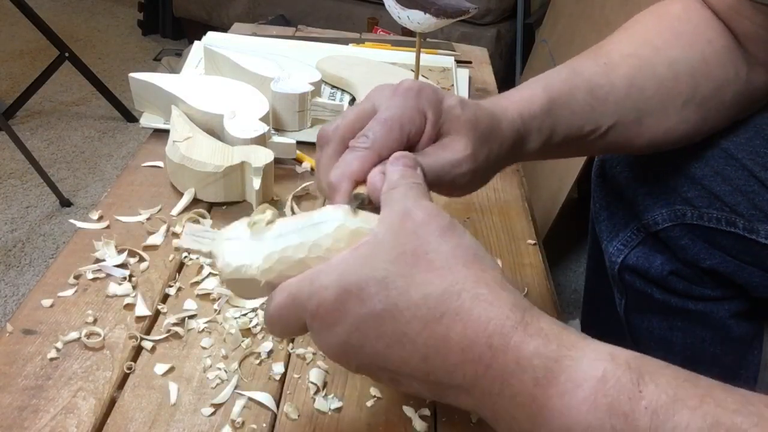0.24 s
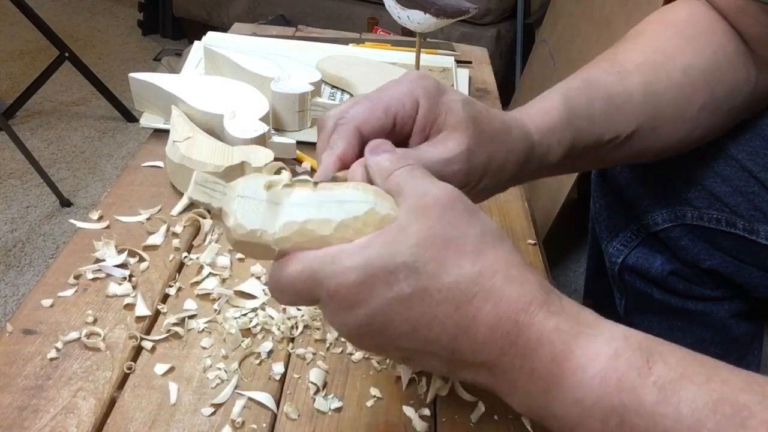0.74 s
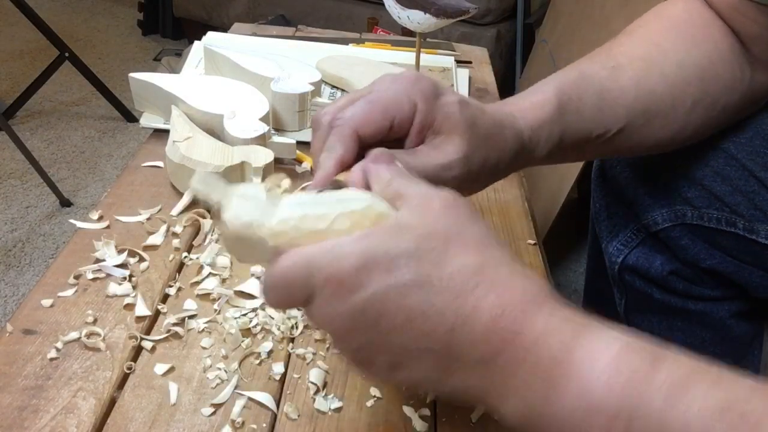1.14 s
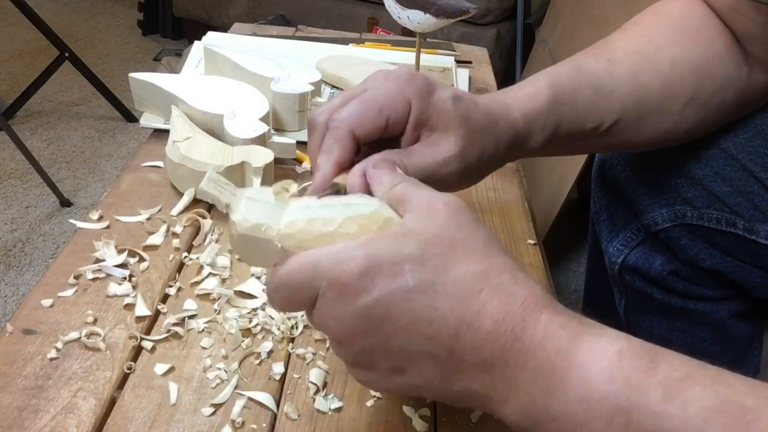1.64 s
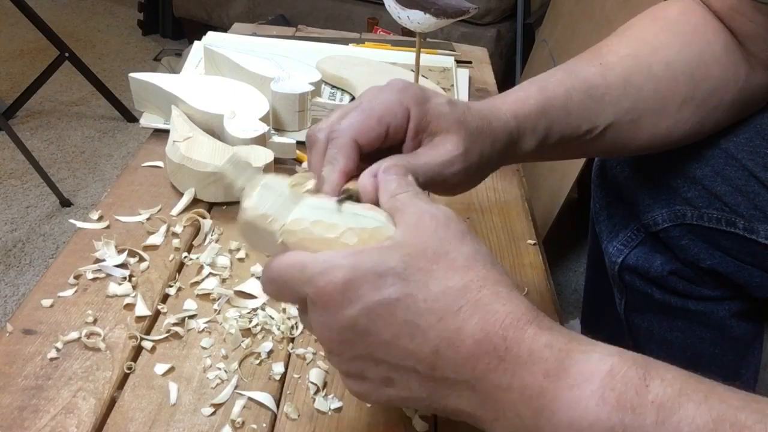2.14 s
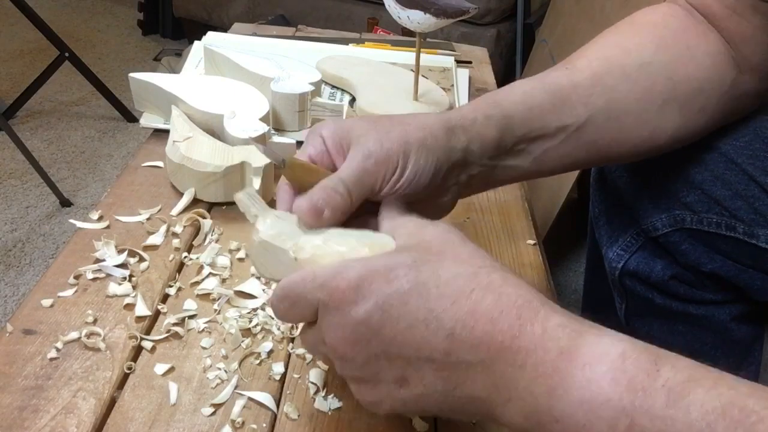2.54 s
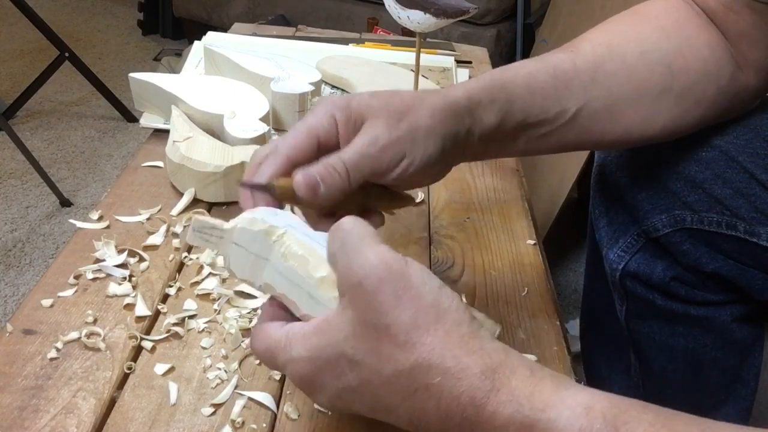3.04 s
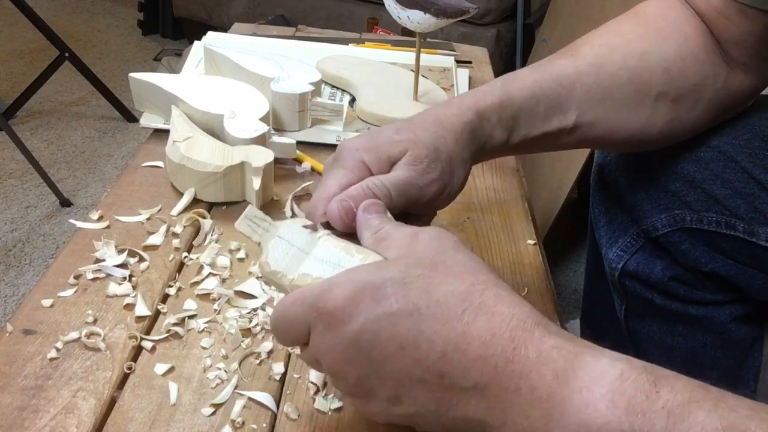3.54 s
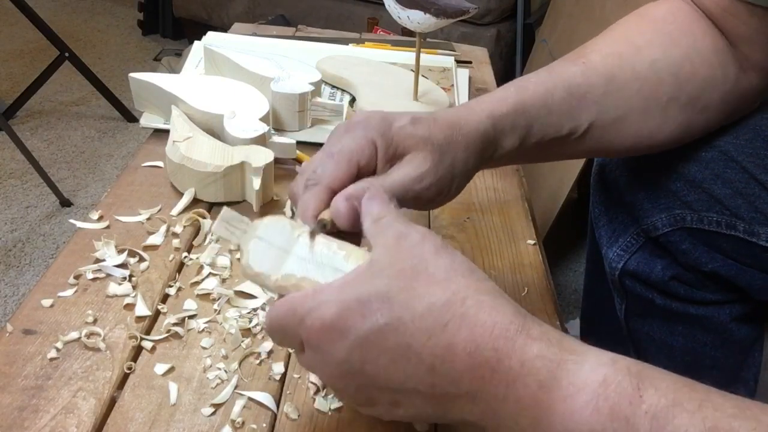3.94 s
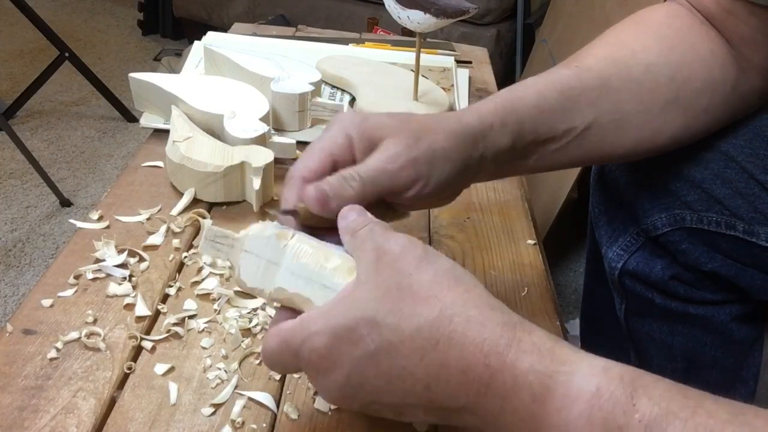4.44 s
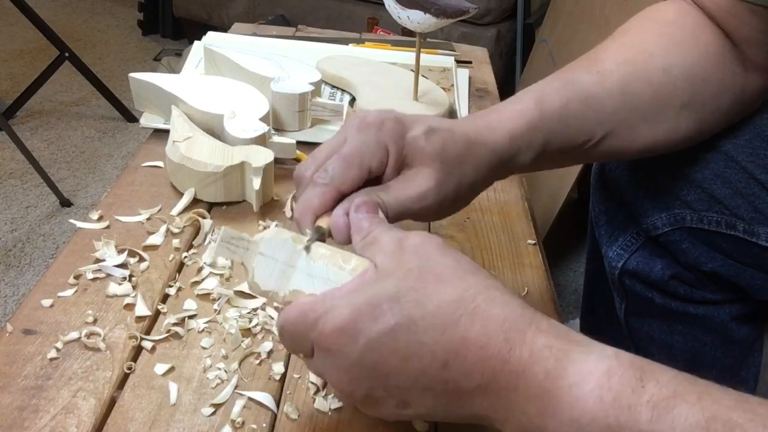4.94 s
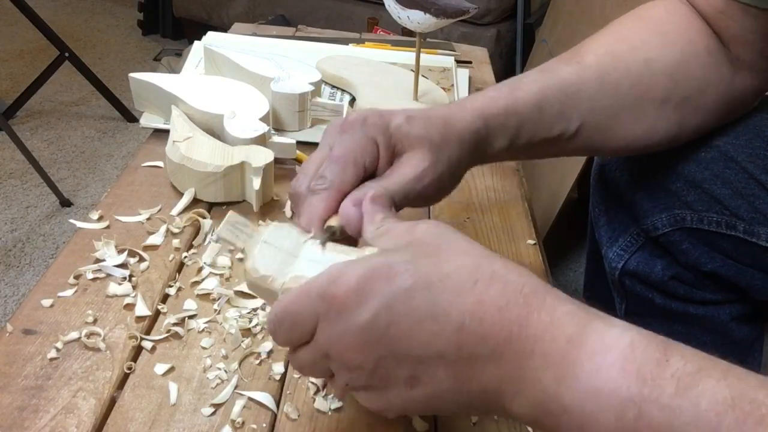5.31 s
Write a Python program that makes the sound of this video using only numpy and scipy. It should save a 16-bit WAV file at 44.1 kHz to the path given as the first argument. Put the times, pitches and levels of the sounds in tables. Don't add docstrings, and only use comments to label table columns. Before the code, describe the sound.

Close-up wood carving in a quiet indoor workspace. Irregular short strokes of a blade scratch and chatter through dry grain, each freeing a shaving with a crisp click. Around three seconds the block is turned, with softer handling and small ticks, then cutting resumes with a slightly different blade ring and finishes in a cluster of hard snaps. Low room air and soft fan hum lie underneath; little reverberation.

```python
import sys
import numpy as np
from scipy import signal
from scipy.fft import rfft, irfft
from scipy.io import wavfile
from scipy.ndimage import uniform_filter1d

SR = 44100
rng = np.random.default_rng(int(sys.argv[2]) if len(sys.argv) > 2 else 0)


def dump(signal):
    limited = np.clip(np.atleast_2d(signal).T, -1, 1)
    pcm = np.round(limited * 32767).astype(np.int16)
    wavfile.write(sys.argv[1], SR, pcm)


def level_to_linear(level):
    exponent = np.asarray(level, float) / 20
    return 10 ** exponent


N = 245637


def evened(x):
    return x / np.sqrt(np.mean(x ** 2) + 1e-20)


def read(points, hz):
    f, value = np.transpose(points)
    return np.interp(np.log(hz + 1), np.log(f + 1), value)


def held(table, s):
    times, *columns = np.transpose(table)
    return [np.interp(s, times, column) for column in columns]


def add(mix, s, sound):
    part = mix[..., round(s * SR):][..., :sound.shape[-1]]
    part += sound[..., :part.shape[-1]]


def blend(a, b, b_db):
    return (a + level_to_linear(b_db) * b) / np.sqrt(1 + level_to_linear(2 * b_db))


def resonate(x, hz, width):
    pole = np.exp((2j * np.pi * hz - np.pi * width) / SR)
    return 2 * signal.lfilter([(1 - abs(pole)) ** 2], [1, -2 * pole, pole ** 2], x).real


def body(x, modes):
    click = signal.unit_impulse(600)
    ring = np.zeros(600)
    for k, (hz, width, db) in enumerate(modes):
        ring = ring + (-1) ** k * level_to_linear(db) * resonate(click, hz, width)
    return signal.oaconvolve(x, ring / np.linalg.norm(ring))[:len(x)]


def grains(chance, spread_db):
    return evened(chance[0] * level_to_linear(spread_db * np.clip(chance[1], -2.5, 2.5)))


# centre_hz, width_hz, level_db
BLOCK = [(1000, 280, -3), (1900, 1120, 3.5), (2630, 1550, 2), (4100, 850, -2)]
# centre_hz, width_hz, level_db
BLADE = [(5085, 180, -4.5), (5590, 2760, 1.5), (7260, 650, 6.5), (7800, 270, 7), (8900, 2880, 3)]
# centre_hz, width_hz, level_db
BLADE_TURNED = [(4910, 800, -1.5), (5960, 2040, 0.5), (7300, 390, 3), (8600, 3400, -3.5)]
# centre_hz, width_hz, level_db
FIZZ = [(10700, 1300, -5), (12200, 1500, 0), (13800, 1500, -2), (15400, 1800, -4.5)]
# centre_hz, width_hz, level_db
CRUNCH = [(4550, 1540, 0)]
# time_s, blade_ring_hz, blade_ring_share (0-1), free_block_ring_hz,
# free_block_ring_db, cut_block_knock_db
GRIP = [(.1, 5570, 0.47, 1000, -7, -15), (.27, 8140, 0.57, 1000, 2.5, -7), (.63, 7300, 0, 1900, 2.5, 0.5),
        (1.127, 8500, .5, 3020, -16, -8), (1.6, 7740, 0.65, 1940, 4, -0.5),
        (1.968, 8000, 0.53, 1900, 4.5, -4.5), (2.25, 7720, 0.7, 4100, -2.5, -11.5),
        (2.544, 7300, 0.4, 3130, 0, -5), (2.9, 7660, 0, 2910, -4, -6.5),
        (3.576, 6100, 0.65, 3200, 2.5, -7.5), (3.696, 6100, 0.98, 3280, 13.5, -6),
        (3.9, 6050, 0.8, 2780, 4, -6), (3.97, 6000, 0.77, 2600, -7, 3),
        (4.228, 6200, 0.96, 4030, 22.5, -15), (4.33, 6040, 0.1, 2820, 6, -19),
        (4.64, 5500, 0.95, 4250, 8.5, -3.5), (4.86, 6100, 0.87, 2850, -2.5, -2),
        (5.1, 6230, 0.8, 2760, -2, -2.5), (5.116, 6200, 0.96, 900, -3.5, -3),
        (5.35, 8300, 0.71, 1900, 4.5, 0.5), (5.45, 6700, 0.15, 2300, 9.5, -10)]
# time_s, second_blade_ring_hz, second_blade_ring_db, splinter_ring_hz,
# cut_splinters_db
SHAVING = [(.27, 5740, -23, 13400, -10), (.65, 8900, -1, 14000, -7), (1.127, 8200, -12, 13900, -7.5),
           (1.6, 8440, -21, 13100, -8.5), (1.968, 8030, -7.5, 13600, -7), (2.25, 7600, -14, 11680, -2),
           (2.6, 5460, -16, 12900, -3), (2.9, 5800, -23, 12700, -1), (3.576, 8960, -10, 13000, -14.5),
           (3.696, 7440, -24, 11700, -7), (3.9, 6700, -5, 12300, -10), (4.04, 6100, -12, 14700, -3.5),
           (4.228, 8650, -29, 12500, -10), (4.85, 8760, -14, 11600, -8), (5.108, 8600, -7, 15000, -10),
           (5.1155, 8600, -17, 15200, 0), (5.36, 6060, -13, 14900, -2), (5.4, 8300, -9, 12500, -1),
           (5.55, 8350, -9, 12600, -1)]
# time_s, splinter_ring_prominence_db, crunch_db
SHAVING_BODY = [(.27, 0, -17), (.65, 7, -18), (1.127, -8, -10.5), (1.6, 3, -10.5), (1.968, 2, -13.5),
                (2.25, 10, -13), (2.6, -1, -9.5), (2.9, -1, -14), (3.576, -2, -16.5), (3.696, 15, -13),
                (3.9, 10, -6), (4.04, 2, -15), (4.228, 8, -16), (4.85, 2, -17.5), (5.11, 4, -17),
                (5.36, 1, -15), (5.4, 9, -7.5), (5.55, 0, -15)]
TURN_S = 3.0


def knife(contacts, splinter_db, blade_width=650, block_width=600, splinter_width=1300):
    heard = np.zeros((2, N))
    near_far = np.array([[1], [.5]])
    for s, force, knock_db, fizz_db, hz in contacts:
        _, focus, free_hz, free_db, _ = held(GRIP, s)
        second_hz, second_db, splinter_hz, _ = held(SHAVING, s)
        prominence_db, crunch_db = held(SHAVING_BODY, s)
        turned = s >= TURN_S
        shade_db = 2.5 if turned else 0.4

        def driven(modes):
            return evened(body(force, modes)) * np.std(force)

        block = driven(BLOCK)
        blade = driven(BLADE_TURNED if turned else BLADE)
        free = driven([(free_hz, block_width, 0)])
        cut = driven([(hz, blade_width, 0), (second_hz, blade_width, second_db)])
        splinters = blend(driven(FIZZ), driven([(splinter_hz, splinter_width, 0)]),
                          splinter_db + prominence_db)
        rest = level_to_linear(knock_db - 6.0) * (block + level_to_linear(free_db) * free * near_far)
        rest += level_to_linear(fizz_db + shade_db) * splinters
        rest += level_to_linear(crunch_db) * driven(CRUNCH)
        share = np.clip(focus * near_far, 0, 1)
        add(heard, s, rest + np.sqrt(1 - share) * blade + np.sqrt(share) * cut)
    return heard


# start_s, length_ms, start_pressure_db, end_pressure_db, blade_ring_hz
CUTS = [(.239, 44, -72.5, -58, 8140), (.541, 59, -66.5, -72, 8300), (.601, 87, -66, -61, 7650),
        (1.09, 43, -63, -72, 8100), (1.134, 53, -50, -80, 5000), (1.49, 67, -64.5, -63.5, 7800),
        (1.571, 23, -56, -64, 7900), (1.844, 35, -65.5, -68, 8600), (1.885, 73, -60, -81, 7860),
        (1.974, 21.4, -47, -55, 7140), (2.222, 57, -62.5, -56, 5700), (2.543, 44, -66, -67.5, 7240),
        (2.588, 46, -63, -54, 7800), (2.878, 43, -70, -60.5, 7600), (3.469, 180, -68.5, -65, 5870),
        (3.98, 47, -67.5, -71, 8600), (4.025, 30.4, -72, -57.5, 8600), (4.053, 30, -61, -78, 8600),
        (4.774, 79, -71.5, -67, 6000), (4.845, 6.2, -70, -64, 6100), (5.059, 35, -75, -56, 6100),
        (5.104, 16, -46, -48.5, 6240), (5.33, 120, -60, -74, 8600), (5.395, 5.3, -57, -52, 5640)]
# start_s, length_ms, start_pressure_db, end_pressure_db
RUBS = [(0, 35, -59.5, -96), (.04, 102, -82, -70.5), (.18, 52, -75, -72), (.295, 23, -67, -95),
        (.341, 73, -67, -75), (.72, 138, -88, -75), (.88, 21, -91, -69), (.972, 27, -68, -77),
        (.995, 76, -82, -66), (1.19, 76, -73, -87), (1.36, 35, -96, -74), (1.558, 16, -70, -70),
        (2.098, 90, -68.5, -74.5), (2.19, 26, -81, -77), (2.283, 13, -74, -66), (2.33, 47, -77, -71),
        (2.5, 43, -72, -73), (2.661, 53, -70, -67.5), (2.75, 42, -71, -71.5), (2.915, 38, -65, -70.5),
        (3.02, 110, -75.5, -83), (3.38, 90, -78, -77), (4.104, 32, -67, -62.5), (4.19, 50, -73, -74),
        (4.302, 12, -72, -74), (4.48, 85, -74, -79), (4.655, 26, -74, -71), (4.96, 58, -78, -72),
        (5.45, 100, -84, -79), (5.525, 24.6, -75, -54.5), (5.549, 28, -56.5, -67)]


def drags():
    for *stroke, ring_hz in CUTS:
        yield *stroke, held(GRIP, stroke[0])[4], ring_hz
    for rub in RUBS:
        ring_hz, _, _, _, knock_db = held(GRIP, rub[0])
        yield *rub, knock_db - 5.5, ring_hz


def strokes(chatter_db=6.0, chatter_ms=2.2, crackle_db=11, crackles_per_s=300, edge_ms=13):
    drift = uniform_filter1d(rng.standard_normal(N), size=40)
    flutter = evened(signal.lfilter([1], [1, -np.exp(-1000 / chatter_ms / SR)], drift))
    slips = level_to_linear(chatter_db * np.tanh(flutter)) * grains(rng.standard_normal((2, N)), spread_db=3.5)
    slips += level_to_linear(crackle_db) * rng.standard_normal(N) * (rng.random(N) < crackles_per_s / SR)
    for s, length_ms, start_db, end_db, knock_db, hz in drags():
        s = max(s - edge_ms / 2000, 0)
        total_ms = length_ms + edge_ms
        part = slips[round(s * SR):][:round(total_ms / 1000 * SR) + 600]
        t_ms = np.arange(len(part)) / SR * 1000
        ends = np.clip(np.minimum(t_ms, total_ms - t_ms) / edge_ms, 0, 1)
        progress = np.clip((t_ms - edge_ms / 2) / length_ms, 0, 1)
        pressure_db = start_db + (end_db - start_db) * progress
        fizz_db = held(SHAVING, s)[3]
        yield s, part * level_to_linear(pressure_db) * np.sin(np.pi / 2 * ends) ** 2, knock_db, fizz_db, hz


# start_s, level_db, tearing_ms, block_knock_db, splinter_fizz_db
SNAPS = [(0.6289, -42, 0.49, -6, -16), (0.661, -45.5, 0.45, -6, -6), (0.6741, -39, 3.1, -26, -5),
         (1.125, -31.5, 5.66, -13, -10), (1.6021, -34, 3, -8, -12), (1.6128, -42, 1, -11, -15),
         (1.9645, -21, 2.5, -12.5, -9), (1.9693, -28, 1.5, -19, -10), (1.98, -47.5, 5.5, -17, -17),
         (2.541, -49, 3.5, -2, 1), (2.6297, -33, 0.82, -15.5, -11), (3.5747, -31, 0.56, -10, -14),
         (3.5803, -41, 1, -11, -6), (3.6943, -32.5, 0.64, -13.5, -15), (4.2268, -41.5, 1.27, -19, -4),
         (4.852, -49.5, 9.6, -2, -11), (4.8588, -30.5, 0.77, -14, -11), (5.0979, -41.5, 12, -9, -14),
         (5.1152, -23.5, 1.26, -7.5, -20), (5.4005, -24.5, 1.05, -8.5, -16)]
# start_s, level_db, tearing_ms, block_knock_db
CRACKS = [(0.134, -65.5, 6.5, -9), (0.258, -57, 1.5, -25), (0.2875, -49.5, 3.8, -6.5),
          (.419, -65, 5.5, -24), (0.6077, -47.5, .3, 0.5), (.6333, -47.5, 0.44, 0), (1.005, -61, 2.4, -4),
          (1.038, -64, 2.6, -2), (1.1082, -55, 1.2, 5), (1.554, -61, 2.9, -4), (1.575, -51, 5.3, -2.5),
          (1.7639, -68, 10, -17), (1.895, -55, 5.3, 0), (1.9556, -61.5, 4.3, 2), (2.1184, -59, 6, -8),
          (2.511, -63, 4.3, -8), (2.558, -67, 1.8, -2), (2.564, -65, 2.8, -4), (2.6936, -62, 1.2, -7),
          (4.0305, -58.5, 4.1, 0.5), (5.0635, -61, 4.1, -9), (5.0782, -57, 2.1, -7),
          (5.0875, -49, 2.6, -17), (5.3255, -46, 1.8, -14), (5.3355, -61, 2, -12), (5.343, -54, 1.5, -11),
          (5.3526, -53, 2.5, 3), (5.369, -58, 2.2, 3), (5.373, -57, 2.2, 0), (5.384, -52, 1.5, -8)]
# start_s, level_db, length_ms
JUDDERS = [(0.2476, -66, 1.5), (0.2648, -59, 6.3), (.277, -54, 3.3), (.281, -51.5, 3.6),
           (0.2858, -57, 0.78), (.5545, -61.5, 4.3), (0.6249, -56, 3.7), (0.67, -53, 3), (.6795, -62, 3.4),
           (1.121, -56, 3.3), (1.594, -60, 2.7), (1.597, -53, 6.3), (1.6055, -43.5, 2.8), (1.985, -45, 2.1),
           (2.2185, -55.5, 7.1), (2.234, -58, 5.4), (2.244, -60, 3), (2.249, -60, 6.6), (2.2588, -55, 3.2),
           (2.264, -54, 2), (2.269, -52, 3.4), (2.2765, -58, 2), (2.553, -65, 1), (2.606, -59, 6),
           (2.6125, -62, 4), (2.619, -60, 5.8), (2.624, -49, 4.5), (3.557, -68, .6), (3.6075, -68, 1),
           (3.981, -65.5, 3), (4.0125, -67, 8.9), (4.038, -66, 2), (4.043, -62, 1.6), (4.0464, -59, 4.6),
           (4.8058, -60, 3), (4.814, -63, 1.7), (4.833, -61, 3.9), (4.85, -56, 3), (5.109, -45, 1.8),
           (5.1115, -48, 2.3), (5.1143, -37, 0.86), (5.1218, -49, 2.9), (5.358, -55, 3.1),
           (5.3907, -52, 4.3), (5.3967, -40, 3.9), (5.4066, -48, 2.1)]
# start_s, level_db, block_knock_db, splinter_fizz_db
TICKS = [(1.2507, -52, -5.5, 1), (1.7153, -44, -11.5, -16), (2.2961, -57, 2.5, -1), (2.398, -60, -1.5, 4),
         (2.415, -58, -22, -1), (2.528, -64, -6, 9), (2.5467, -44, -19, -6), (2.716, -67, -9, -7),
         (3.013, -53, 1, -18), (3.198, -57.5, -1, -13), (3.4272, -57, -21, -17), (3.501, -55.5, -18, -14),
         (3.5104, -58, -9, -10.5), (3.56, -66, 9, -11), (3.595, -50, -18, -6), (3.6026, -57, -1, -8),
         (3.6988, -36, -13.5, -18), (3.7019, -42, -15, -15), (3.734, -65, -5, 1), (3.8996, -53, 9, -8),
         (4.114, -59.5, -3, -4), (4.2117, -58, -27, -19), (4.284, -62, -22, -4), (4.3278, -55.5, -3, -4),
         (4.6328, -53, -8.5, -27), (4.6522, -55, -19, -26), (4.845, -60, 8, -2), (3.7265, -62, -12, -3),
         (4.2015, -65, -19, -3), (4.2245, -59, -12, -6), (4.2458, -58, -28, -15), (4.342, -62, -6, -4)]


def breaks():
    for snap in SNAPS:
        yield *snap, 6100
    for crack in CRACKS:
        yield *crack, -8.5, held(GRIP, crack[0])[0]
    for s, db, ms in JUDDERS:
        cut_ring_hz = [cut[4] for cut in CUTS if cut[0] < s + .005][-1]
        yield s, db, ms, held(GRIP, s)[4], held(SHAVING, s)[3], cut_ring_hz
    for s, db, knock_db, fizz_db in TICKS:
        yield s, db, 0.6, knock_db, fizz_db, 5500


def snaps(rise_ms=0.41, fall_ms=0.77, crack_db=13, soft=0.097):
    t_ms = np.arange(900) / SR * 1000
    crack = level_to_linear(crack_db) * signal.unit_impulse(900, 16)
    for s, db, tear_ms, knock_db, fizz_db, hz in breaks():
        blur_ms = soft * max(tear_ms - 2, 0)
        rise = 1 - np.exp(-t_ms / (rise_ms + blur_ms))
        fall = np.exp(-np.maximum(t_ms - tear_ms + blur_ms, 0) / (fall_ms + blur_ms))
        tearing = grains(rng.standard_normal((2, 900)), spread_db=1) * rise * fall
        sudden = crack / (1 + tear_ms ** 2)
        yield s, level_to_linear(db + 2) * (tearing + sudden), knock_db, fizz_db, hz


# start_s, peak_db, starting_pitch_hz, t60_s, palm_knock_db
JOLTS = [
    (0.685, -56, 147, 0.058, -66),
    (1.132, -48, 153, 0.063, -42),
    (1.611, -40, 173, 0.046, -48.5),
    (1.973, -38.5, 174, 0.047, -59),
    (4.864, -37, 154, 0.012, -44),
    (5.121, -45, 166, 0.025, -40),
    (5.407, -47.5, 158, 0.032, -45),
]
# centre_hz, width_hz, level_db
PALM = [(450, 360, 0), (800, 360, 0), (1150, 400, -1.7)]


def jolts(sag=0.33, sag_s=0.016, rise_s=0.0012, palm_lead_s=0.00603, palm_t60_s=0.013):
    out, t = np.zeros(N), np.arange(6000) / SR
    rise = 1 - np.exp(-t / rise_s)
    for s, db, hz, t60, palm_db in JOLTS:
        turns = np.cumsum(hz * (sag + (1 - sag) * np.exp(-t / sag_s))) / SR
        add(out, s - .003, level_to_linear(db - 60 * t / t60) * rise * -np.cos(2 * np.pi * turns))
        knock = evened(body(rng.standard_normal(len(t)), PALM))
        add(out, s - palm_lead_s, level_to_linear(palm_db - 60 * t / palm_t60_s) * rise * knock)
    return out


# frequency_hz, t60_s
ROOM = [(300, 0.12), (1300, 0.12), (3500, 0.077), (6000, 0.19), (9000, 0.12), (14000, 0.15)]
# frequency_hz, level_db
ROOM_COLOUR = [(500, -3), (2000, 1), (4000, 1.5), (5500, -8), (9000, -1.5), (12000, -4.5), (16000, -16)]


def room(x, first_ms=2.2):
    taps = np.zeros(SR // 2)
    at = np.arange(0, SR // 2 - 20, 20)
    taps[at + rng.integers(0, 20, len(at))] = rng.choice([-1., 1.], len(at))
    hz, t, z = signal.stft(taps, SR, nperseg=128)
    decay = level_to_linear(-60 * t / read(ROOM, hz)[:, None])
    tail = signal.istft(z * decay, SR, nperseg=128)[1]
    tail *= np.clip(np.arange(len(tail)) / SR * 1000 / first_ms - 1, 0, 1)
    colour = level_to_linear(read(ROOM_COLOUR, np.fft.rfftfreq(len(tail), 1 / SR)))
    echoes = irfft(rfft(tail / np.linalg.norm(tail)) * colour, len(tail))
    return signal.fftconvolve(x, echoes)[:N]


# frequency_hz, density_db
AIR = [(35, -41), (70, -12.5), (150, -2), (520, -8.5), (928, -16), (6050, -22.5), (15700, -28),
       (16150, -56)]
# centre_hz, width_hz, level_db, extra_start_db
HUM = [(119, 4, -81, -2), (152, 14, -81, -2), (240, 1, -85, 5), (332, 3, -80, -8), (350, 16, -83, -8),
       (395, 9, -86, -6), (527, 12, -85, -3), (1575, 25, -90, 0)]


def air(patchy_db=1.57, level_db=-68, settle_s=0.82, rumble_start_db=-4):
    frames, hz = N // 256 + 5, np.fft.rfftfreq(1024, 1 / SR)
    a, b, patches = rng.standard_normal((frames, 513, 3)).T
    patches = uniform_filter1d(patches, size=12, axis=0)
    patches = evened(uniform_filter1d(patches, size=14, axis=1))
    low = 1 / (1 + (hz[:, None] / 600) ** 4)
    early = np.exp(-np.arange(frames) * 256 / SR / settle_s)
    db = read(AIR, hz)[:, None] + patchy_db * (1 - low / 2) * patches + rumble_start_db * low * early
    hiss = signal.istft((a + 1j * b) * level_to_linear(db), nperseg=1024, noverlap=768)[1][:N]
    out = level_to_linear(level_db) * evened(hiss)
    early = np.exp(-np.arange(N) / SR / settle_s)
    for hz, width, db, start_db in HUM:
        out += level_to_linear(db + start_db * early) * evened(resonate(rng.standard_normal(N), hz, width))
    return out


def scene():
    snapping = knife(snaps(), splinter_db=-3.0, blade_width=850, block_width=910)
    scraping = knife(strokes(), splinter_db=-14.0, blade_width=740, block_width=1100)
    near, far = snapping + scraping
    return (near + level_to_linear(-10.5) * room(far) + jolts() + air())[None]


def top_cut(x):
    return signal.sosfilt(signal.butter(12, 16860, fs=SR, output="sos"), x)


def record(dry):
    bass = signal.butter(4, 58, "highpass", fs=SR, output="sos")
    top = signal.cheby2(10, 45, 16350, fs=SR, output="sos")
    return top_cut(signal.sosfilt(np.vstack([bass, top]), dry))


dry = scene()
out = record(dry)
dump(out)
```